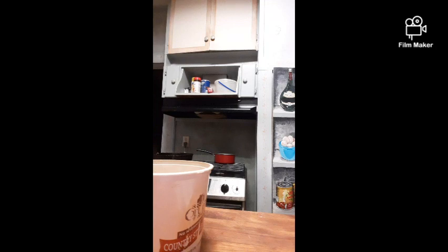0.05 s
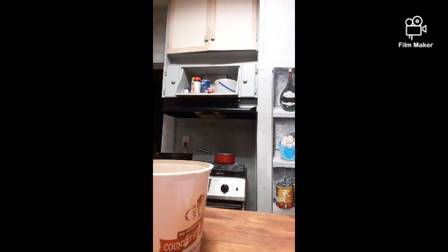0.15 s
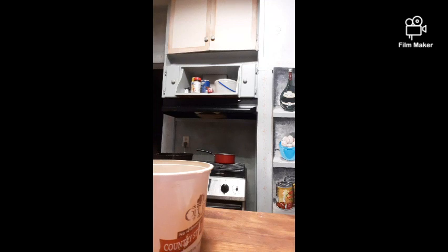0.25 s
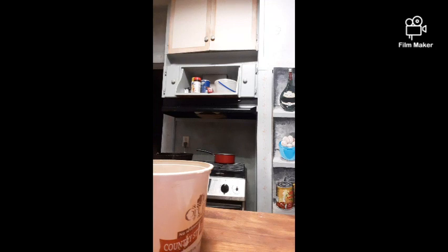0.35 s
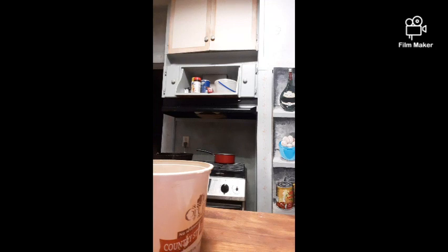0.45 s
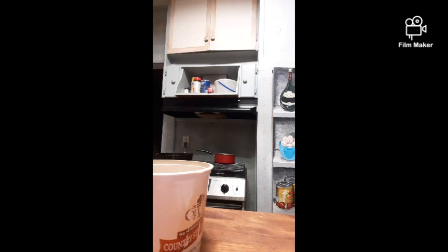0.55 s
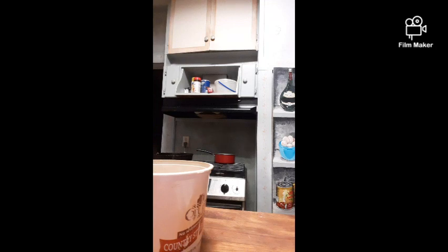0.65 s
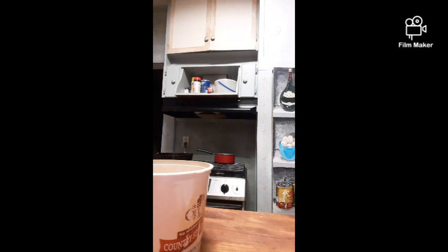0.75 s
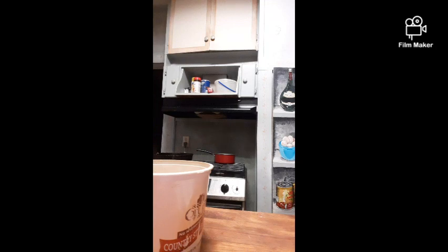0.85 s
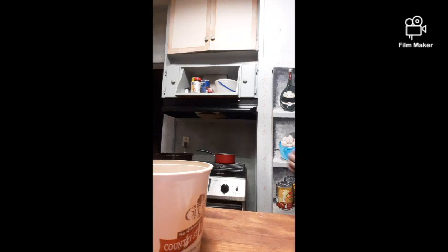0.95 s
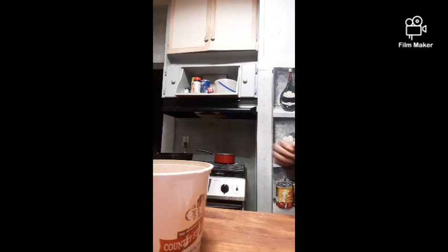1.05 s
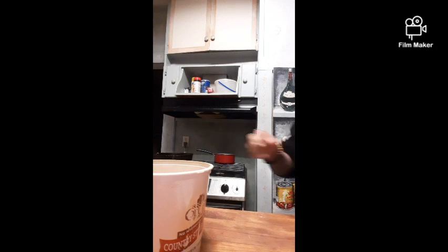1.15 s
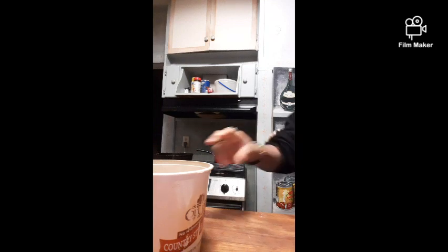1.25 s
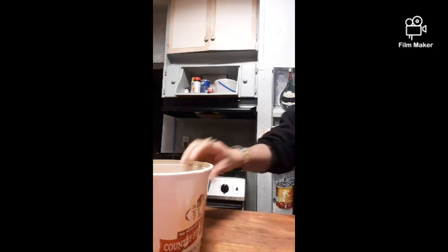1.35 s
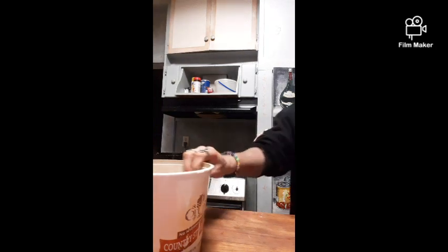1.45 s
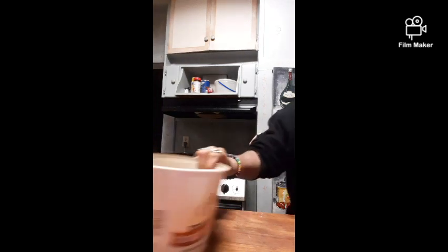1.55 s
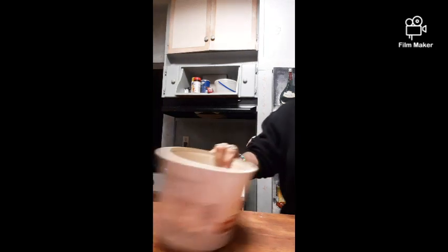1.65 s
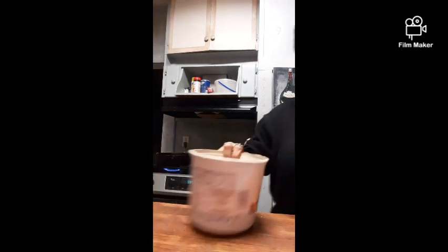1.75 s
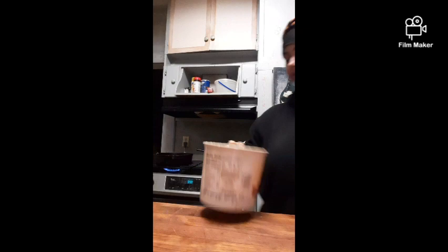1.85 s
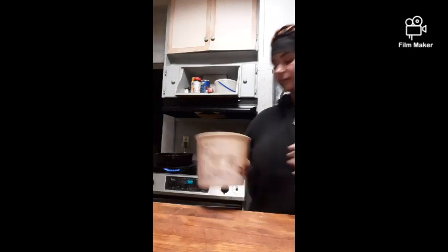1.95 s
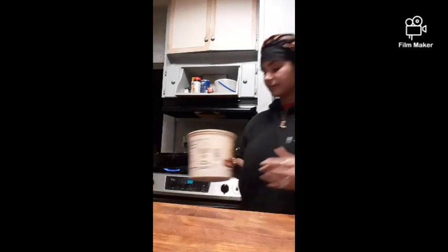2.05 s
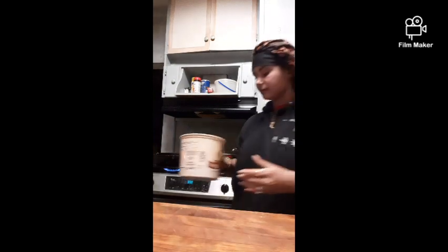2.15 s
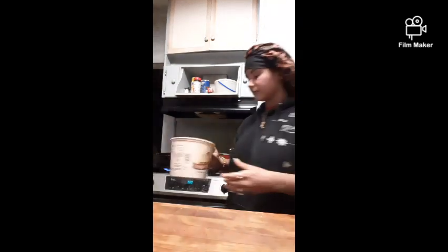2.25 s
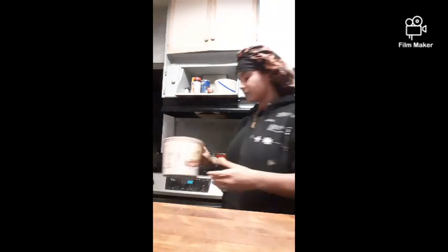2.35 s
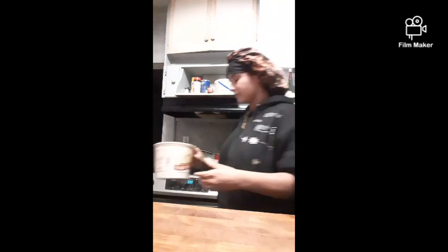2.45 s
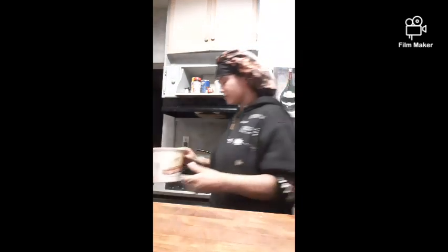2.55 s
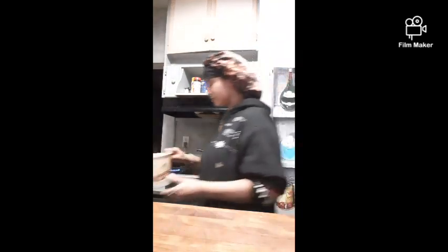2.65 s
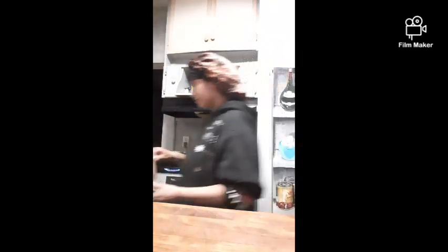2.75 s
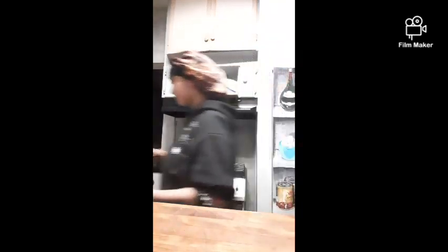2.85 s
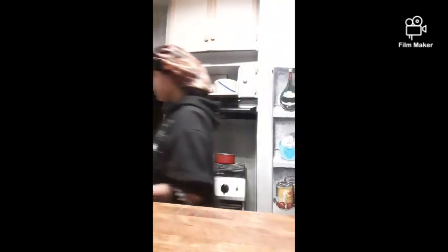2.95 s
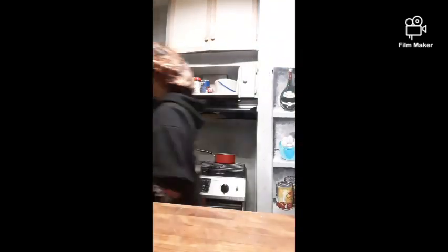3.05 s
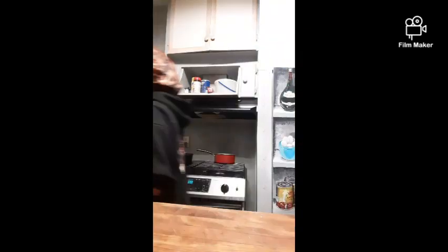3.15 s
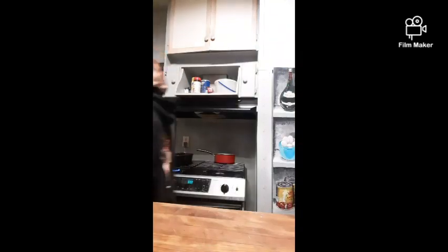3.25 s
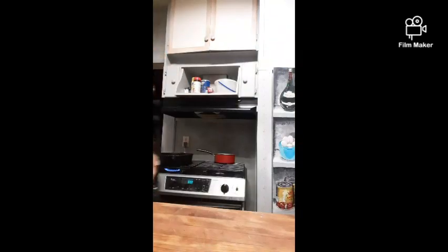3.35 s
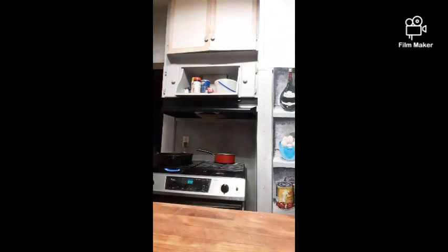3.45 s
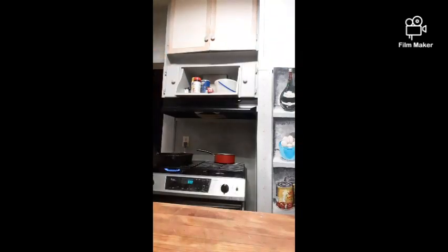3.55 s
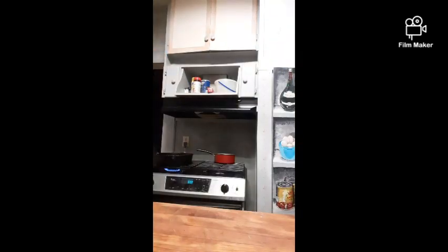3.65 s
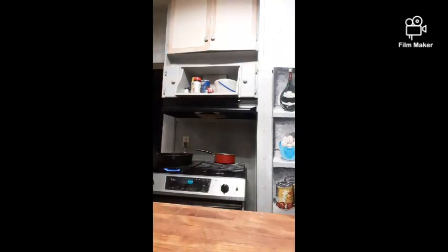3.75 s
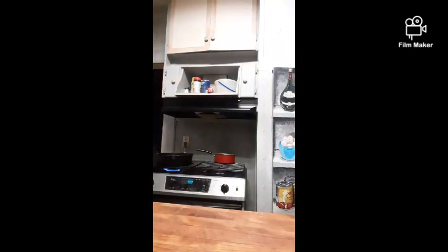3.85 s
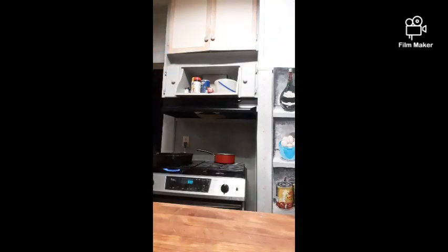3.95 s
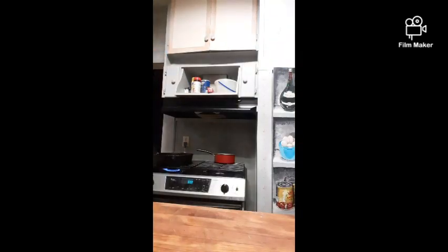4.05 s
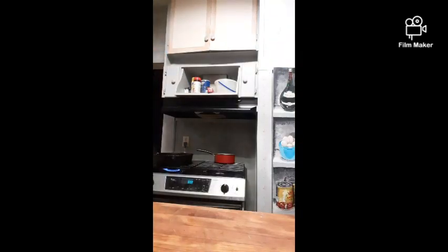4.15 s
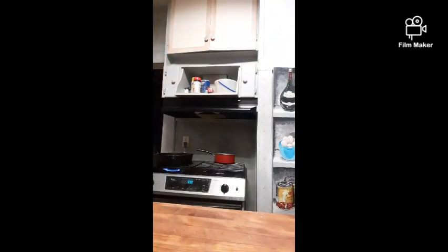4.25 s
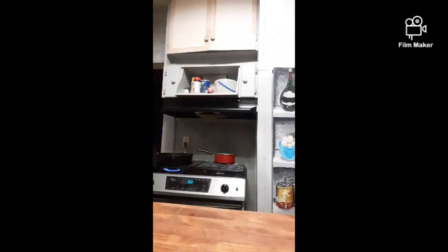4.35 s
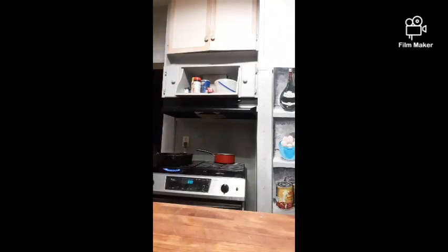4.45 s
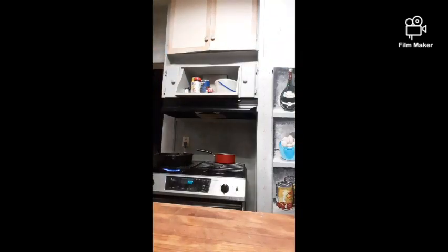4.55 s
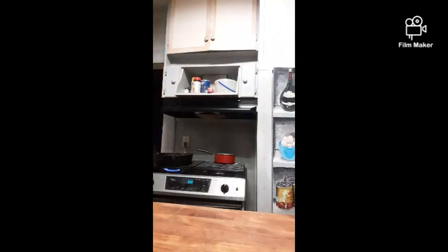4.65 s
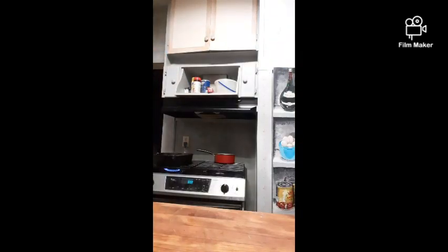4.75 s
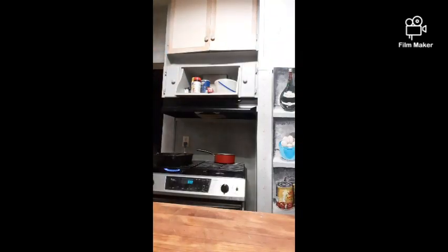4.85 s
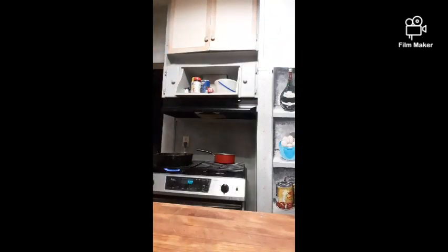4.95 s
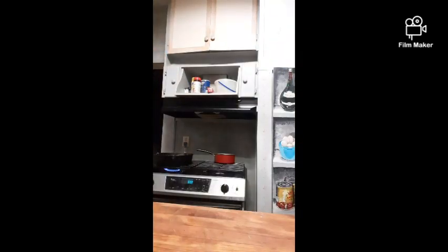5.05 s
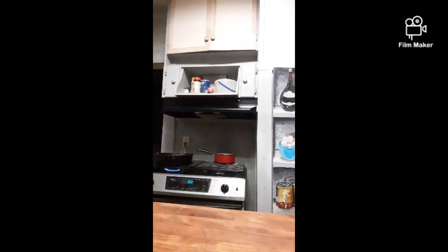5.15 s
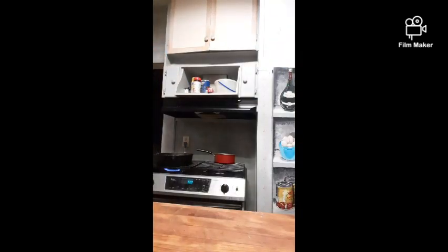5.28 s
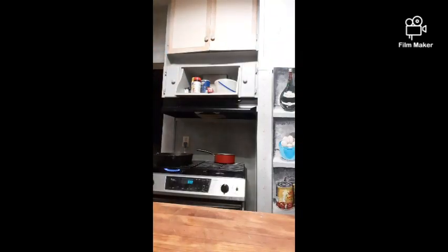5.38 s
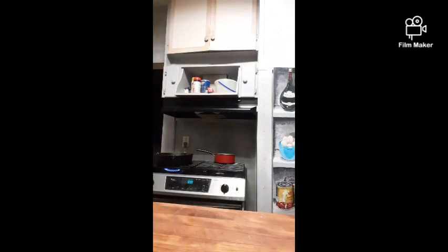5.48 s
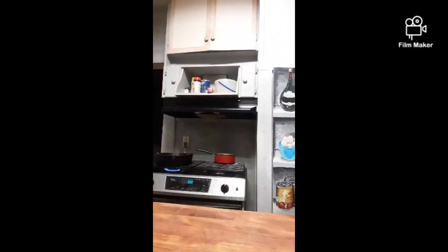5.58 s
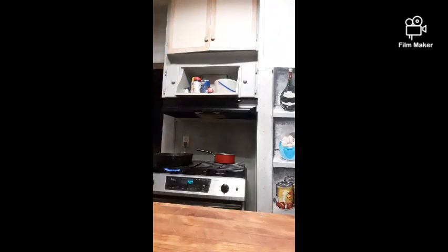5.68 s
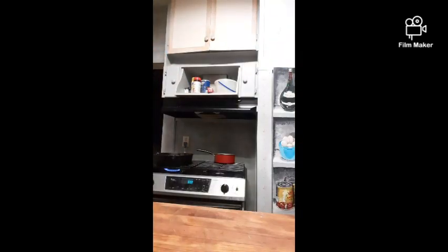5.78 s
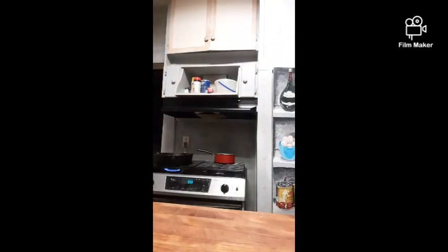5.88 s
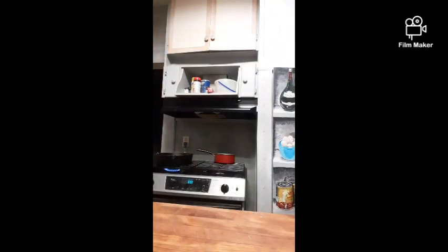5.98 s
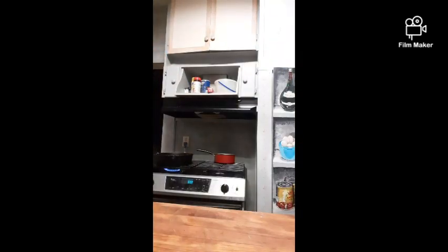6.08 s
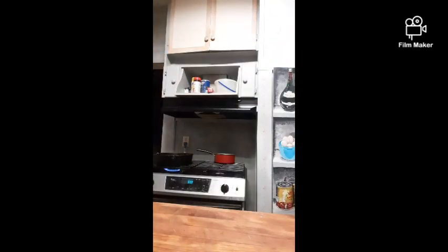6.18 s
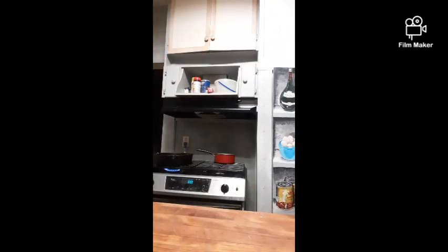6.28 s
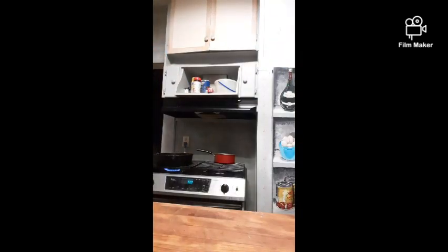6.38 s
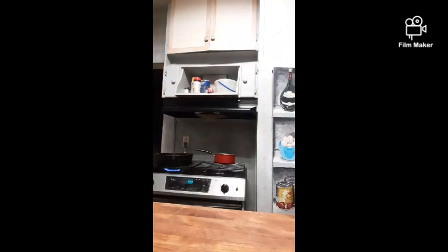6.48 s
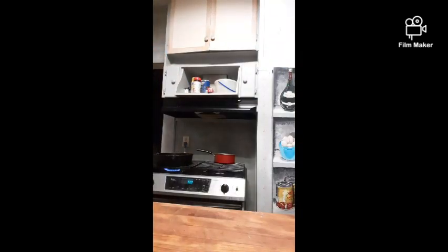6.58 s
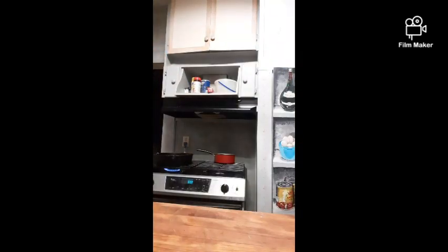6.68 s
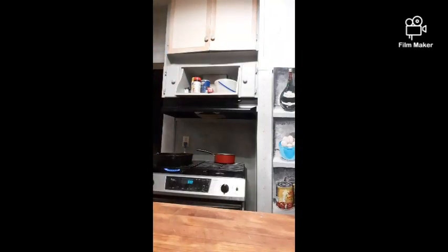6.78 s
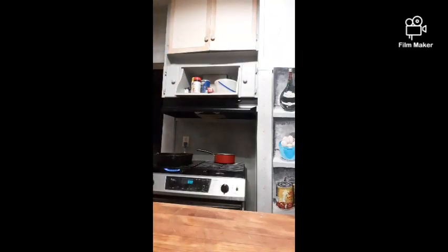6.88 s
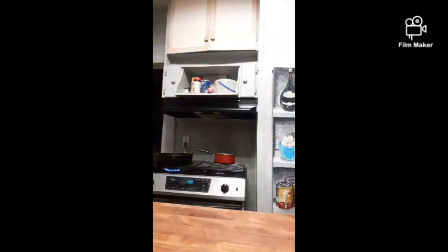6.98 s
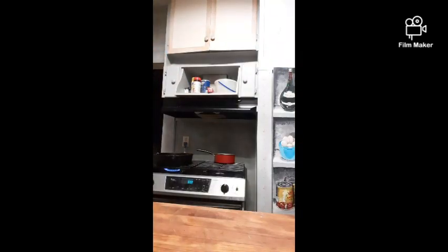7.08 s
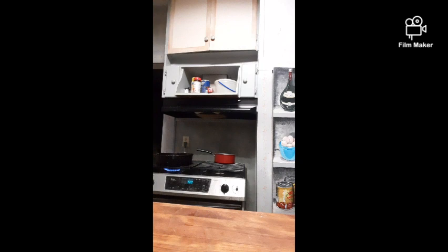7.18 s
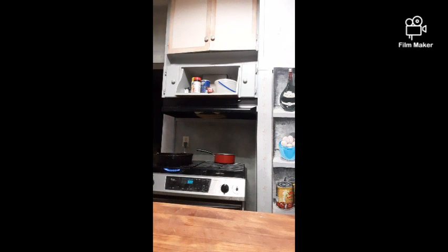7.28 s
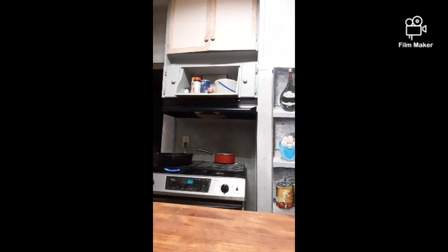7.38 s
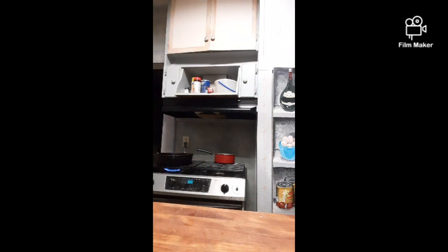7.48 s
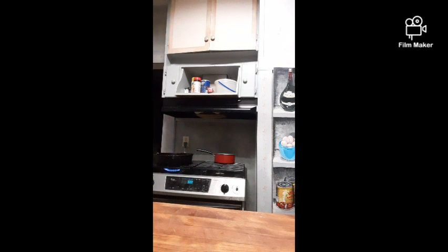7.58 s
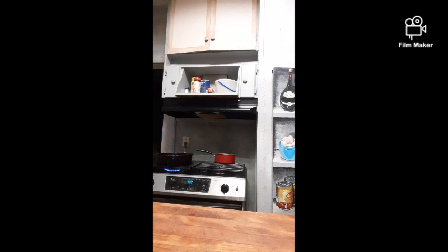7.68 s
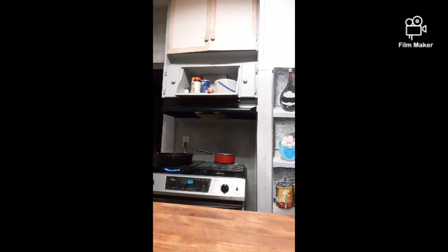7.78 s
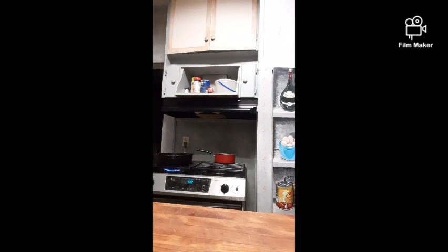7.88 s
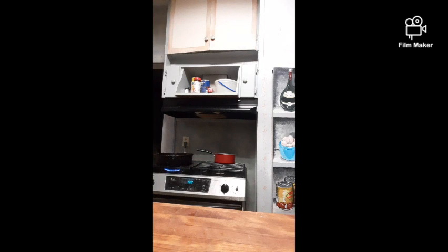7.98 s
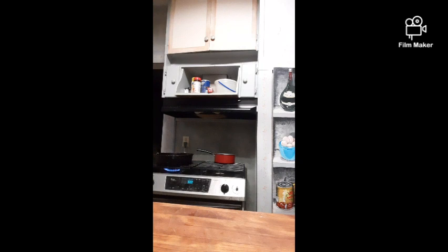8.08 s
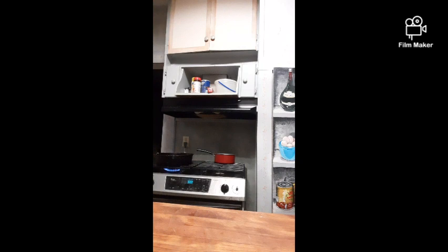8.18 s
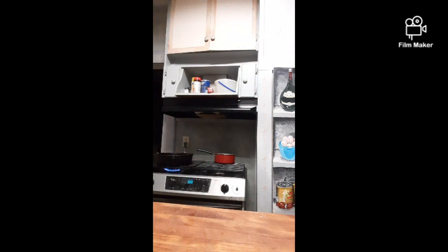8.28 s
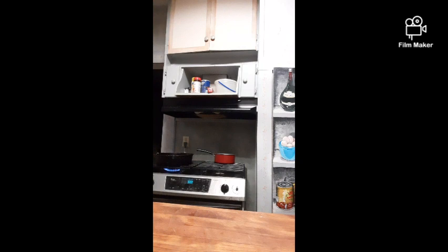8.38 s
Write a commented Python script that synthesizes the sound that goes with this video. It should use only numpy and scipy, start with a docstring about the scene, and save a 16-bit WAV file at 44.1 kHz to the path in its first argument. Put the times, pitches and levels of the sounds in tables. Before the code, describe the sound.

Steady gas stove hiss with faint hum; two small hollow pops, a dull tub knock on wood, cloth rustle, then quiet footfalls.

```python
"""A gas burner hisses and softly roars in a small home kitchen: flickering third-octave noise, plus room modes.
A plastic tub is grabbed off the wooden counter: noisy pushes ring damped modes, two hollow pops glide up.
Cloth rustles as the cook passes (grains in gliding bands); soft footsteps ring the modes of the floor.
A wavering mains sine lies below; feedback delays answer the cook's sounds."""
import sys
import numpy as np
from scipy import signal
from scipy.io import wavfile

SR = 44100
rng = np.random.default_rng(int(sys.argv[2]) if len(sys.argv) > 2 else 0)


def materialize(psi):
    """Save the field psi as 16-bit PCM at rate SR to the path in sys.argv[1].

    A 1-D psi becomes a single channel; in a 2-D psi each row is a channel.
    """
    bounded = np.clip(np.atleast_2d(psi).T, -1, 1)
    quanta = np.round(bounded * 32767).astype(np.int16)
    wavfile.write(sys.argv[1], SR, quanta)


N = 371322


def from_db(db):
    """Decibels to amplitude gain."""
    return 10 ** (np.asarray(db) / 20)


def rms_one(x):
    """Scale to unit rms."""
    return x / np.sqrt(np.mean(x ** 2) + 1e-20)


def in_time(rows):
    """Interpolate each column of a time table to one value a sample."""
    time_s, *columns = np.transpose(rows)
    return [np.interp(np.arange(N) / SR, time_s, column) for column in columns]


def at_hz(points, hz):
    """Read a spectrum on a log-frequency axis."""
    points_hz, values = np.array(points).T
    return np.interp(np.log(hz), np.log(points_hz), values)


def drift(rate_hz):
    """Slow random drift of unit rms: noise through a double one-pole low-pass."""
    step = 40   # samples per drawn value
    pole = np.exp(-2 * np.pi * rate_hz * step / SR)
    noise = rng.standard_normal(N // step + 2002)
    slow = signal.lfilter([1], [1, -2 * pole, pole ** 2], noise)[2000:]   # drop the run-in
    return np.interp(np.arange(N) / step, np.arange(len(slow)), rms_one(slow))


def ring(x, hz, t60_s):
    """Damped mode: a unit click starts a decaying sine of height 1."""
    r, w = from_db(-60 / (t60_s * SR)), 2 * np.pi * hz / SR
    return signal.lfilter([0, np.sin(w)], [1, -2 * r * np.cos(w), r * r], x + 1e-18)


def resonance(x, hz, width_hz):
    """Two-pole band-pass with unit peak gain."""
    r = np.exp(-np.pi * width_hz / SR)
    top = np.array([1, 0, -1]) * (1 - r * r) / 2
    return signal.lfilter(top, [1, -2 * r * np.cos(2 * np.pi * hz / SR), r * r], x)


HUM_HZ, HUM_DB, HUM_LATER_DB = 61, -69, -76.5
HUM_FALLS_S, HUM_FALL_LENGTH_S = 1.45, .45   # the hum drops as the tub is lifted


def hum():
    """Mains sine whose level wavers and steps down."""
    t = np.arange(N) / SR
    level_db = np.interp(t, [HUM_FALLS_S, HUM_FALLS_S + HUM_FALL_LENGTH_S], [HUM_DB, HUM_LATER_DB])
    level = from_db(level_db + 4.7 * drift(6.5))
    return level * np.sqrt(2) * np.sin(2 * np.pi * HUM_HZ * t) * from_db([[1.5], [-1.5]])


KITCHEN_T60_S, WALL_CUT_HZ = 0.22, 4200


def kitchen(x):
    """Reverberation: eight feedback delays a side, duller on every round."""
    out, dull = np.zeros((2, N)), np.exp(-2 * np.pi * WALL_CUT_HZ / SR)
    lags = (rng.uniform(.012, .035, 16) * SR).astype(int)
    for k, lag in enumerate(lags):
        gain = from_db(-60 * lag / SR / KITCHEN_T60_S)
        loop, state = x + 1e-18, [0.]
        for i in range(lag, N, lag):   # one block per round trip
            back, state = signal.lfilter([gain * (1 - dull)], [1, -dull], loop[i - lag:i], zi=state)
            loop[i:i + lag] += back[:N - i]
        out[k % 2] += (loop - x) * (-1) ** (k // 2)
    return out


def blows(events, modes):
    """Contacts: a short uneven push rings each mode; thump weights low modes, sharpness high ones."""
    out, t = np.zeros(N), np.arange(SR // 3) / SR
    for time_s, db, contact_ms, thump_db, sharp_db in events:
        swell = 1000 * t / contact_ms
        push = rng.standard_normal(len(t)) * np.sqrt(swell) * np.exp(-swell)
        at = round(time_s * SR)
        for hz, mode_db, t60_s in modes:
            weight_db = db + mode_db + thump_db * (hz < 150) + sharp_db * (hz > 600)
            rung = ring(resonance(push, hz, hz), hz, t60_s)   # only the push near the mode's pitch
            out[at:at + len(t)] += from_db(weight_db) * rung / np.abs(rung).max()
    return out


# footfalls: (time [s], level [dB], contact time constant [ms], thump [dB], sharpness [dB])
FOOTFALLS = [(2.808, -39, 7.3, -16, -4), (3.51, -45.5, 12, -11, -1.5), (4.08, -45.5, 12, -5, -8),
             (4.63, -45, 27, -8, -12), (4.687, -43.5, 8, -2, -0.5), (5.236, -37.5, 22, -8, -9),
             (5.72, -51, 12, 4, -8)]
# floor modes: (frequency [Hz], level [dB], t60 [s])
FLOOR_MODES = [(52, -6, .15), (135, -4, 0.07), (199, -2, .07), (289, 1.5, 0.065), (351, 1.5, 0.087),
               (424, 2, 0.057), (530, -2.5, 0.073), (720, 5, 0.036), (905, 1, 0.056), (1160, -4, 0.032)]


def footsteps():
    """Soft soles push the floor modes."""
    return blows(FOOTFALLS, FLOOR_MODES)


# strokes of cloth and hand:
# (time [s], rise [s], fall [s], peak level [dB], start [Hz], end [Hz], breadth [octaves])
STROKES = [(1.18, .04, .08, -46.5, 1100, 1200, .95), (1.496, 0.0092, 0.089, -38.5, 2800, 2500, 0.76),
           (1.66, .045, 0.032, -44, 900, 900, .75), (2.21, 0.073, .07, -40, 5500, 1300, 0.44),
           (2.29, .15, 0.092, -41.5, 1700, 3300, .9), (5.58, .027, .025, -38, 4550, 4600, 0.14),
           (6.43, 0.033, 0.031, -42, 2200, 2150, 0.21), (6.5, .04, .04, -44, 1800, 1600, .2)]
STROKE_EDGE_DB = -10.5   # stroke ends re peak, before the edge taper


def rustle():
    """Cloth friction: dense uneven grains through a gliding band; level rises and falls."""
    out, centres_hz = np.zeros(N), np.geomspace(400, 7000, 22)
    for time_s, rise_s, fall_s, db, start_hz, end_hz, octaves in STROKES:
        at, count = round(time_s * SR), round((rise_s + fall_s) * SR)
        edges_s, edges_db = [0, rise_s, rise_s + fall_s], [STROKE_EDGE_DB, 0, STROKE_EDGE_DB]
        level = from_db(db + np.interp(np.arange(count) / SR, edges_s, edges_db))
        grains = rng.standard_normal(count) * from_db(3.5 * rng.standard_normal(count))
        glide_hz = np.geomspace(start_hz, end_hz, count)
        distance_octaves = np.log2(glide_hz / centres_hz[:, None])
        weights = np.exp(-(distance_octaves / octaves) ** 2)
        weights /= np.sqrt(np.sum(weights ** 2, axis=0))
        bands = [rms_one(resonance(grains, hz, 0.1 * hz)) for hz in centres_hz]
        stroke = level * np.sum(weights * bands, axis=0)
        out[at:at + count] += stroke * signal.windows.tukey(count, .2)
    return out


# hollow pops: (time [s], peak level [dB], start [Hz], end [Hz], length [s])
CAVITY_POPS = [(0.023, -29.5, 296, 510, .017), (0.136, -37.5, 292, 523, .02)]


def pops():
    """Closing cavity: one swelling tone that glides up."""
    out = np.zeros(N)
    for time_s, db, start_hz, end_hz, length_s in CAVITY_POPS:
        at, count = round(time_s * SR), round(length_s * SR)
        phase = 2 * np.pi * np.cumsum(np.linspace(start_hz, end_hz, count)) / SR
        out[at:at + count] += from_db(db) * np.sin(phase) * signal.windows.tukey(count, .6)
    return out


# counter and tub contacts: (time [s], level [dB], contact time constant [ms], thump [dB], sharpness [dB])
TUB_KNOCKS = [(0.016, -40.5, 1.8, -4, 4), (0.04, -41.5, 12, -3, -1), (1.203, -48.5, 10, -10, 5),
              (1.498, -37.5, 2.5, 3, -2), (1.512, -35, 6.2, 2, -3), (1.543, -37.5, 6.2, -7, -10),
              (1.58, -44.5, 18, -1, -18)]
# counter modes: (frequency [Hz], level [dB], t60 [s])
COUNTER_MODES = [(62.5, -3, 0.11), (124, -1, 0.13), (190, -12, 0.088), (253, -6.5, 0.24), (270, 2.5, 0.073),
                 (336, 3, 0.062), (400, 4, 0.065), (497, 4, 0.039), (643, -2, 0.073), (905, -3, 0.061),
                 (1235, -1, 0.044), (2130, -2, .03), (2700, -22, .03), (3420, -22, .02)]


def knocks():
    """Tub and hand push the modes of the wooden counter."""
    return blows(TUB_KNOCKS, COUNTER_MODES)


# stereo correlation of diffuse noise: (frequency [Hz], left-right likeness [0-1])
STEREO_LIKENESS = [(25, .9), (60, 0.77), (120, 0.95), (240, .98), (450, 1), (740, 0.62), (1220, 0.049),
                   (2000, 0.11), (3500, 0.043), (15000, 0)]
# stereo balance: (frequency [Hz], left over right [dB])
STEREO_LEAN = [(60, 10), (140, 3), (330, 1.5), (500, -2), (770, -3.5), (1170, -1.5), (1800, 1), (2700, 3),
               (6000, 5), (10000, 3), (15000, 0)]


def turbulence(spectrum, tilt_db, together_db, own_db, lag_s, direct):
    """Turbulent gas: flickering third-octave stereo noise; a direct share reaches the right late."""
    low_hz, high_hz = spectrum[0][0], spectrum[-1][0]
    edges_hz = low_hz * 2 ** np.arange(0, np.log2(high_hz / low_hz) + .3, 1 / 3)
    out, together, lag = 0, drift(1.6) + .5 * drift(9.2), round(lag_s * SR)
    white = rng.standard_normal((2, 3, N))   # neighbouring bands get unrelated noise
    for k, (low, high) in enumerate(zip(edges_hz, edges_hz[1:])):
        band = signal.butter(2, [low, high], "band", fs=SR, output="sos")
        mid, side, beam = signal.sosfilt(band, white[k % 2])
        hz = np.sqrt(low * high)
        alike = at_hz(STEREO_LIKENESS, hz)
        diffuse = np.sqrt((1 + alike) / 2) * mid + np.sqrt((1 - alike) / 2) * side * [[1], [-1]]
        beam_pair = np.array([beam, np.roll(beam, lag)])
        pair = np.sqrt(1 - direct) * diffuse + np.sqrt(direct) * beam_pair
        flicker_db = together_db * together + own_db * drift(8.5)
        gain = from_db(at_hz(spectrum, hz) + tilt_db * np.log2(hz / 4000) + flicker_db)
        lean = from_db(at_hz(STEREO_LEAN, hz) / 2 * np.array([[1], [-1]]))
        out = out + gain * pair * lean
    return out / np.sqrt(np.mean(out.mean(axis=0) ** 2))


# jet noise spectrum: (frequency [Hz], relative density [dB per Hz])
HISS_SPECTRUM = [(290, -16.5), (500, -6.5), (770, -9.5), (1100, -8.5), (1460, -5.5), (2100, -1.5),
                 (3000, -1), (4500, 0), (5600, -2), (6300, -5.5), (9000, -9), (12000, -11), (14000, -16.5),
                 (16000, -23)]
# flame noise spectrum: (frequency [Hz], relative density [dB per Hz])
ROAR_SPECTRUM = [(15, -68), (25, -36), (45, -16), (91, -17.5), (113, -10.5), (199, -3.5), (279, -2),
                 (461, -11), (598, -14), (813, -22), (1200, -10.5), (1560, -48), (2640, -120)]
# standing waves of the room: (frequency [Hz], width [Hz], relative level [dB])
STANDING_WAVES = [(116.7, 8.7, -7), (137.5, 4.2, -1), (174, 8.2, -2.5), (202.6, 4.6, -10),
                  (239.3, 13, -2.5), (275.7, 13.4, -3.5), (307, 12, 2.5), (334.5, 15, -1), (398.7, 8.7, 2),
                  (418, 14, -12)]
# jets, a little shaded while the cook is near: (time [s], hiss level [dB], tilt [dB per octave])
JET_LEVELS = [(0, -36.5, 0), (0.9, -38, .5), (2.2, -37.5, 0.14), (3.2, -38.5, 0.5), (3.9, -37.5, 0.2),
              (5.6, -37.5, -.3), (6.4, -37, 0), (8.42, -37, 0)]
# low roar: (time [s], level [dB])
ROAR_LEVELS = [(0.2, -47), (0.31, -49), (0.86, -49), (1.48, -45.5), (2.08, -49), (2.85, -46.5), (3.29, -50),
               (3.52, -48.5), (7.53, -47.5), (8.03, -49), (8.42, -46)]
ROOM_RING_DB = 5.5   # standing waves re bare roar


def burner():
    """Jets hiss high; the flame roars low and excites the room's standing waves."""
    hiss_db, tilt_db = in_time(JET_LEVELS)
    roar_db, = in_time(ROAR_LEVELS)
    hiss = turbulence(HISS_SPECTRUM, tilt_db, 0.38, 0.92, lag_s=.00045, direct=0.17)
    roar = turbulence(ROAR_SPECTRUM, 0, 0.33, 0.47, lag_s=0, direct=0)
    waves = sum(from_db(db) * resonance(roar, hz, width_hz) for hz, width_hz, db in STANDING_WAVES)
    roar = roar + from_db(ROOM_RING_DB) * waves
    return from_db(hiss_db) * hiss + from_db(roar_db) * rms_one(roar)


def scene():
    """Steady burner and hum, with the cook's movements in the room."""
    cook = footsteps() + rustle() + pops() + knocks()
    cook_pair = cook * from_db([[.7], [-.7]])
    return hum() + from_db(-16.0) * kitchen(cook) + cook_pair + burner()


def port(x, peaks):
    """Lift or dip the sound around each resonance in turn."""
    for hz, width_hz, db in peaks:
        x = x + (from_db(db) - 1) * resonance(x, hz, width_hz)
    return x


# left microphone port resonances: (frequency [Hz], width [Hz], gain [dB])
LEFT_COLOUR = [(610, 65, 4), (820, 110, 0.5), (1110, 89, 3.5), (1740, 76, 3), (1935, 160, -6.5),
               (3200, 450, 1), (3870, 650, -2), (5500, 400, 1), (5860, 400, -2.5), (7100, 300, -2.5),
               (7500, 500, 2.5), (8200, 600, 2.5), (12800, 900, 0)]
# right microphone port resonances: (frequency [Hz], width [Hz], gain [dB])
RIGHT_COLOUR = [(1070, 230, 0), (1460, 120, -1), (1710, 100, 2), (2520, 200, -0.5), (3200, 760, -3),
                (4200, 720, 2.5), (5870, 400, -1.5), (7000, 400, 0.5), (7760, 1200, 0.5), (9740, 860, 3),
                (11100, 2000, 1)]
BASS_CUT_HZ, TOP_CUT_HZ = 35, 15750


def record(dry):
    """Port resonances colour each side; filters roll off deep bass and cut the top."""
    heard = np.array([port(dry[0], LEFT_COLOUR), port(dry[1], RIGHT_COLOUR)])
    high_pass = signal.butter(2, BASS_CUT_HZ, "high", fs=SR, output="sos")
    low_pass = signal.ellip(14, .5, 80, TOP_CUT_HZ, fs=SR, output="sos")
    return signal.sosfilt(low_pass, signal.sosfilt(high_pass, heard))


dry = scene()
out = record(dry)
materialize(out)
```